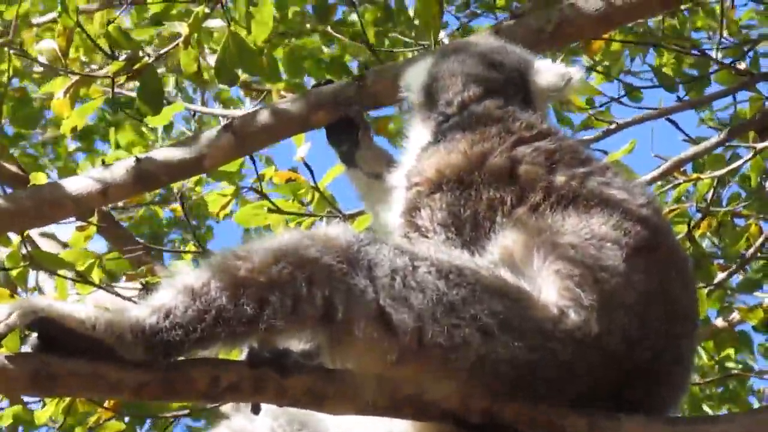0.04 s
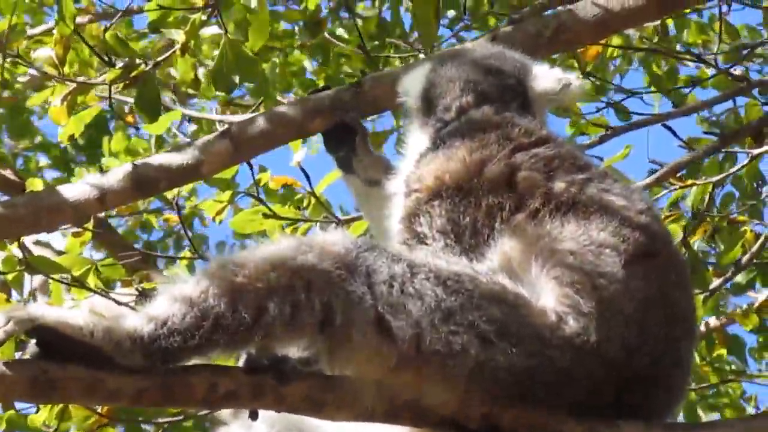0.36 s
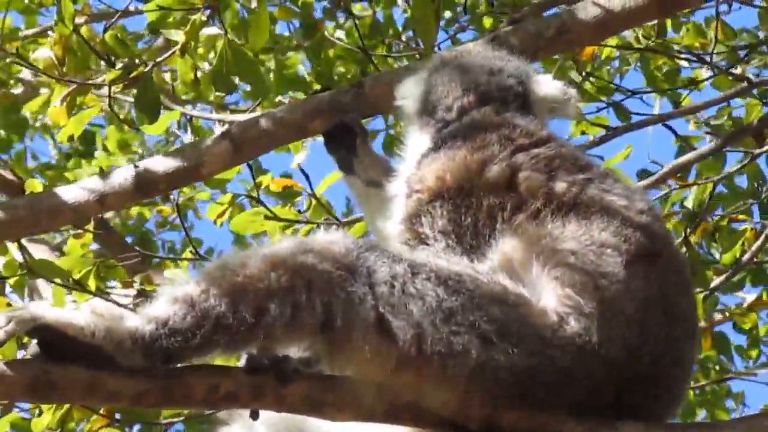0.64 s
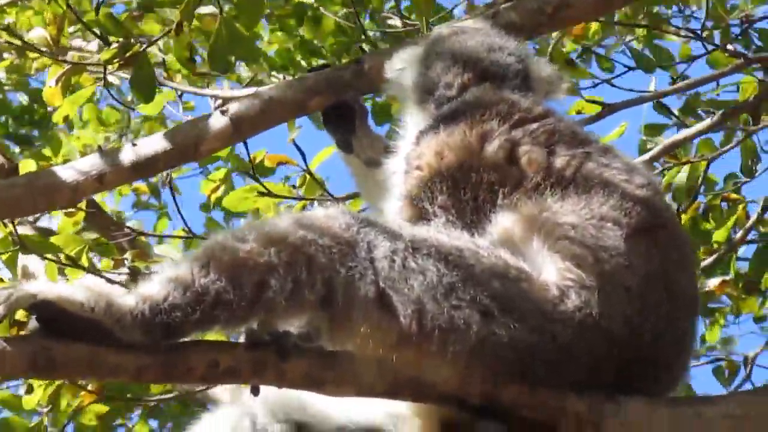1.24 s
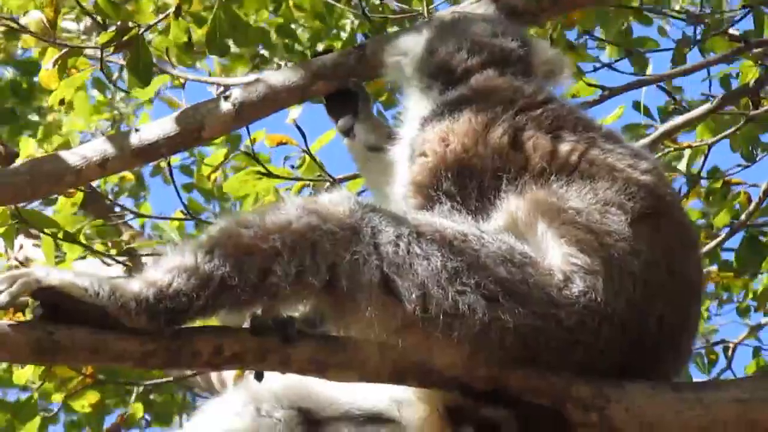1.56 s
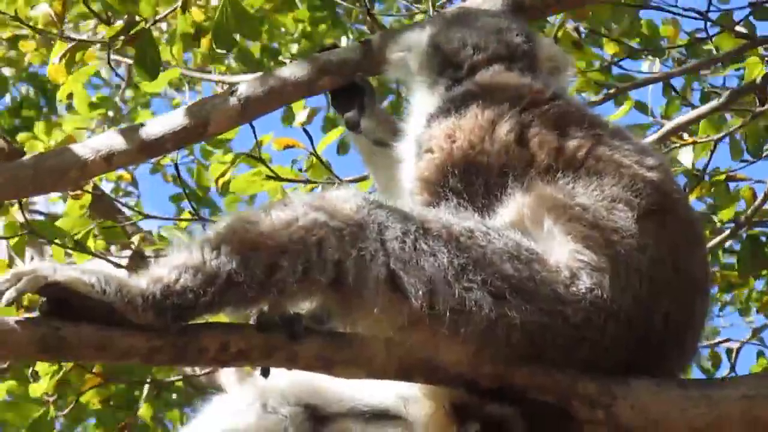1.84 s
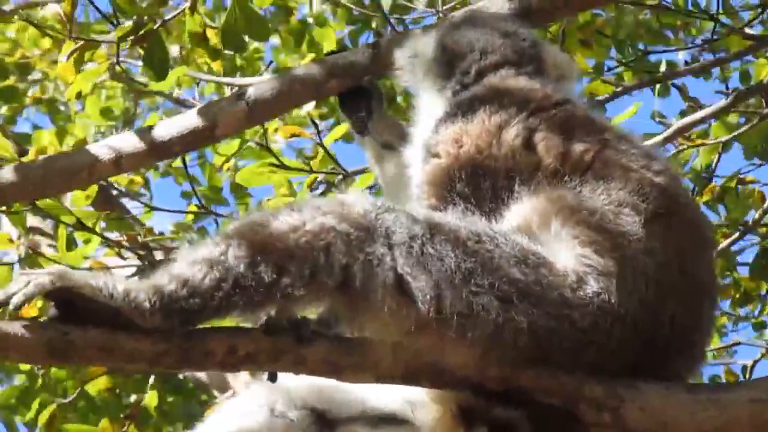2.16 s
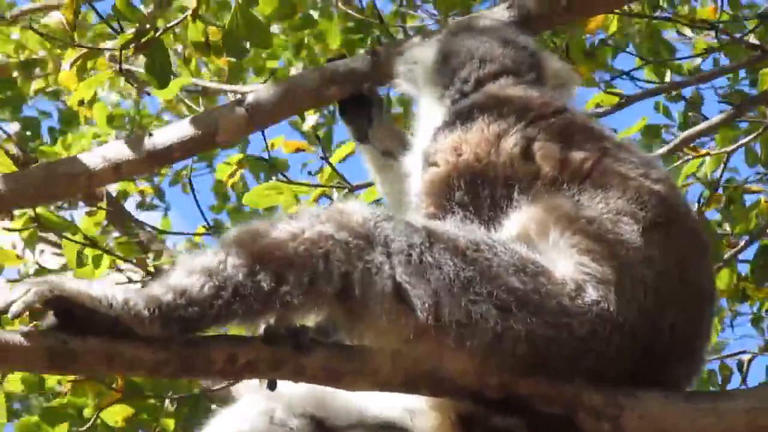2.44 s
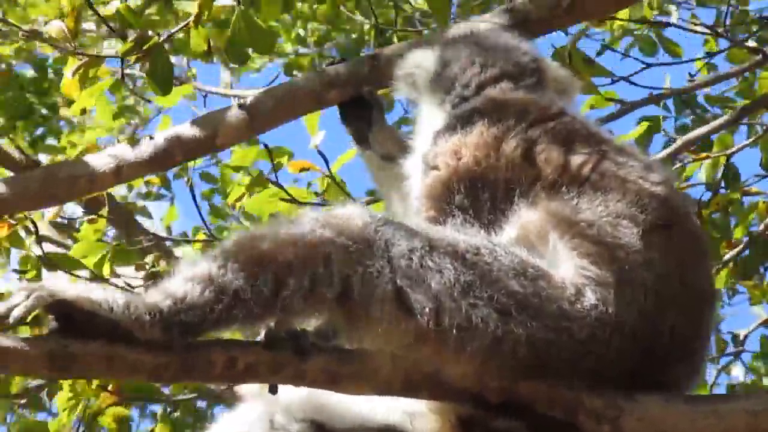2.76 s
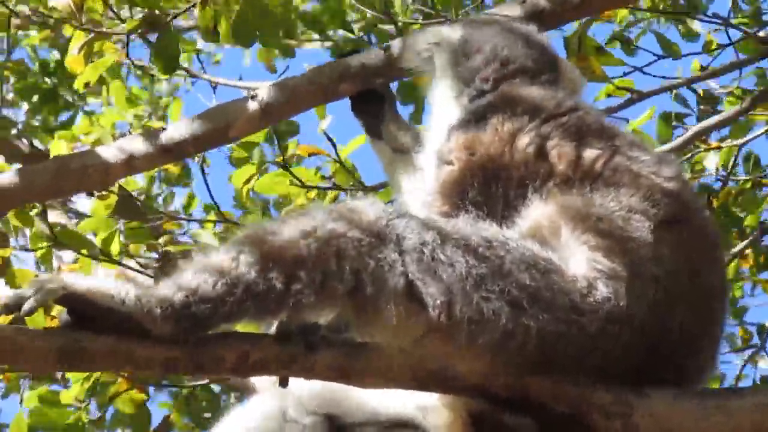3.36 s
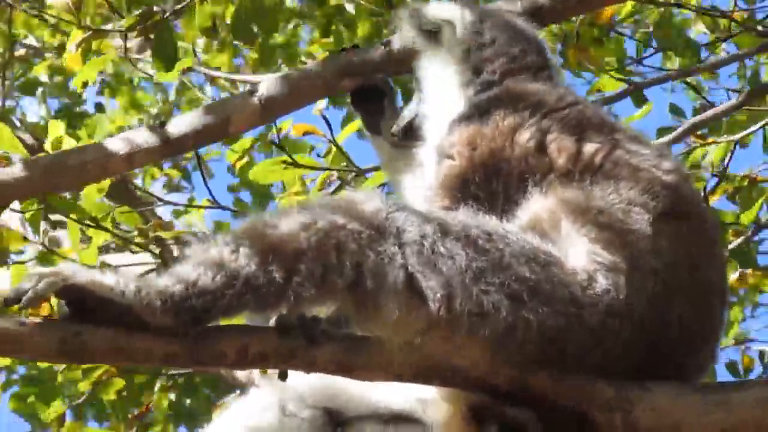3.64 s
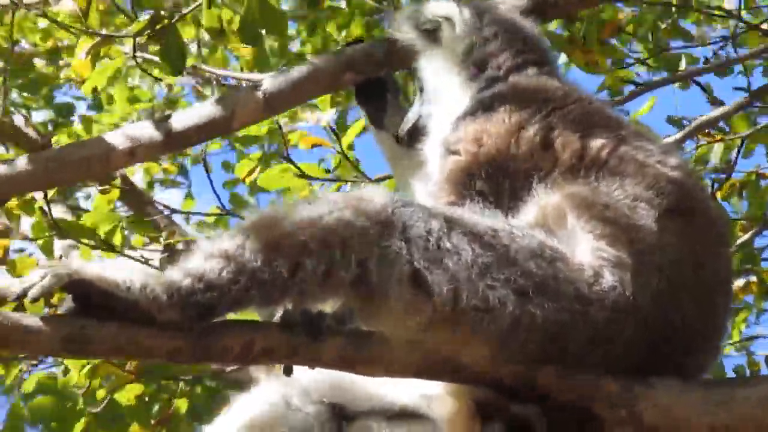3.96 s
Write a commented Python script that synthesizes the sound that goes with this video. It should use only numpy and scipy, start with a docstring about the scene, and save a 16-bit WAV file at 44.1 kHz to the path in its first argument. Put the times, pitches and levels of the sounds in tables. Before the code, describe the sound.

Wind buffets the microphone with a low, uneven rumble, mostly on the right, over a soft, steady hiss of leaves. The gusts thump hardest from about 1 to 2 seconds and ease after 3. A small bird gives three faint, very high, rasping, falling calls at about 2.6, 3 and 3.4 seconds. Brief, faint dry rustles come near 1.1, 3.4 and 3.9 seconds.

```python
"""Wind on a microphone under a tree

Turbulent pressure buffets the two ports of a camera microphone, mostly the right one; stronger wind
feeds the small eddies most, so gusts are brighter as well as louder. A small bird gives three thin,
rasping, falling calls, and there are a few dry rustles over a steady broadband hiss of leaves.
The hardest thump of wind makes the camera's limiter duck everything for a moment."""
import sys
import numpy as np
from scipy import signal
from scipy.fft import rfft, irfft, next_fast_len
from scipy.io import wavfile
from scipy.ndimage import uniform_filter1d, minimum_filter1d, map_coordinates

SR = 44100
rng = np.random.default_rng(int(sys.argv[2]) if len(sys.argv) > 2 else 0)


def digitize_waveform(pressure):
    """Quantize a signal to 16-bit integers and store it at the path in sys.argv[1].

    Rows of a 2-D input are taken as channels; values are limited to [-1, 1].
    """
    field = np.atleast_2d(pressure).T
    bounded = np.clip(field, -1, 1)
    quanta = np.round(bounded * 32767).astype(np.int16)
    wavfile.write(sys.argv[1], SR, quanta)


N = 176400
T = np.arange(N) / SR

# wind strength at each port; the right is windward most of the time (t/s, level/dB)
LEFT_WIND = [(0.0, -29.5), (0.03, -31.5), (0.1, -35), (0.13, -17), (0.16, -42), (0.18, -21), (0.21, -37),
             (0.29, -29), (0.32, -44), (0.43, -43), (0.52, -25.5), (0.56, -20.5), (0.58, -19.5),
             (0.74, -22.5), (0.83, -39.5), (0.93, -39), (0.96, -32), (1.04, -41), (1.15, -32), (1.2, -46),
             (1.25, -33), (1.35, -43), (1.53, -25), (1.58, -17.5), (1.61, -27.5), (1.64, -14), (1.71, -39),
             (1.83, -27), (1.85, -10), (1.91, -44), (2.29, -41), (2.32, -32), (2.51, -40), (2.75, -33),
             (2.77, -39), (3.0, -33.5), (3.02, -22), (3.05, -40), (3.07, -27), (3.1, -37), (3.14, -30),
             (3.17, -41.5), (3.66, -46.5), (3.71, -32), (3.75, -38), (3.78, -29), (3.8, -30.5), (3.99, -55)]
RIGHT_WIND = [(0.0, -29), (0.05, -31.5), (0.09, -18.5), (0.12, -30.5), (0.24, -16.5), (0.31, -32),
              (0.33, -22.5), (0.35, -28.5), (0.44, -35.5), (0.46, -19.5), (0.53, -25), (0.59, -20),
              (0.7, -30.5), (0.73, -17), (0.78, -26.5), (0.81, -35.5), (0.89, -25.5), (0.93, -25.5),
              (0.96, -17), (0.98, -13.5), (1.01, -30), (1.05, -27.5), (1.09, -14), (1.14, -14), (1.2, -13),
              (1.32, -13), (1.35, -18.5), (1.51, -18), (1.59, -25), (1.61, -15.5), (1.73, -27.5),
              (1.78, -15), (1.87, -18), (1.9, -29), (2.12, -13), (2.15, -26), (2.18, -17), (2.21, -33.5),
              (2.25, -22), (2.29, -22), (2.32, -21.5), (2.39, -22), (2.42, -15.5), (2.46, -36.5),
              (2.49, -24), (2.52, -36), (2.56, -21.5), (2.65, -18.5), (2.68, -27.5), (2.72, -24.5),
              (2.8, -31), (2.82, -18.5), (2.88, -33), (2.91, -24), (2.94, -34), (3.01, -28), (3.06, -45),
              (3.14, -30.5), (3.17, -46), (3.36, -36), (3.46, -23), (3.57, -37), (3.63, -29), (3.68, -43),
              (3.75, -33), (3.81, -21.5), (3.84, -43), (3.89, -46), (3.97, -25.5), (3.99, -35)]
# pressure spectra of three sizes of eddy (f/Hz, relative level/dB)
LARGE_EDDIES = [(5, -50), (15, -6), (27, -8), (55, 0), (100, -5), (160, -17.5), (260, -45), (600, -58),
                (2000, -120)]
MIDDLE_EDDIES = [(8, -52), (30, 1.5), (90, -2), (150, -1), (240, -7), (350, -22), (550, -45), (1200, -80),
                 (3000, -120)]
SMALL_EDDIES = [(10, -50), (60, 15), (180, -7.5), (290, 3.5), (420, -3.5), (600, -15), (900, -28.5),
                (1600, -40), (5000, -85)]
# single hard eddies (t/s, pulse level/dB, centre f/Hz, port: 0 left, 1 right)
THUMPS = [(0.085, -11, 187, 1), (0.127, -7, 59, 0), (0.558, -4.5, 129, 0), (0.586, -6, 164, 1),
          (0.745, -7, 152, 1), (0.958, -3, 205, 1), (0.969, -6, 236, 1), (1.084, -9, 330, 1),
          (1.094, -4.5, 282, 1), (1.146, 4.5, 199, 1), (1.159, -4.5, 240, 1), (1.179, 0, 264, 1),
          (1.223, -5, 318, 1), (1.251, -1, 182, 1), (1.31, -8, 278, 1), (1.583, -8.5, 65, 0),
          (1.776, 1, 165, 1), (1.851, -9.5, 99, 0), (1.863, -7, 222, 1), (2.104, -7.5, 151, 1),
          (2.331, -5.5, 217, 1), (2.416, -8.5, 117, 1), (2.606, -17, 247, 1), (2.825, -15, 179, 1),
          (3.078, -17.5, 150, 0), (3.464, -15, 136, 1), (3.781, -12, 64, 0), (3.804, -9.5, 107, 1)]
# bird calls (start t/s, duration/s, f/Hz, level/dB, sag/Hz, final fall/Hz)
BIRD_CALLS = [(2.585, .28, 7360, -54, 30, 813), (2.972, .325, 7380, -48.5, -3.5, 870),
              (3.37, 0.41, 7300, -49.5, 181, 541)]
# dry rustles (start t/s, time until decay/s, level/dB, left minus right/dB)
RUSTLES = [(1.103, .018, -43.5, 2.5), (3.36, .026, -53, .5), (3.932, .014, -47.5, 2)]
# spectra of the rustles, the near leaves and the farther trees (f/Hz, relative level/dB)
RUSTLE_SPECTRUM = [(1000, -17), (3500, -6), (6500, 5), (7500, -6.5), (8600, 8.5), (10300, -5), (12400, 2),
                   (15000, -4), (17000, -30)]
LEAF_SPECTRUM = [(400, 6), (1200, 5.5), (2200, -2), (3000, -0.5), (4000, -2), (5200, 0), (6800, -0.5),
                 (8600, -3), (10300, -8), (12500, -7), (15500, -14)]
FAR_SPECTRUM = [(30, -3), (120, 2.5), (280, 1), (520, 2), (750, -1), (1300, -5), (1800, -10.5),
                (2400, -17.5), (3500, -19), (6000, -57), (12000, -62)]
# channel balance of the near leaves (f/Hz, left minus right/dB)
LEAF_BALANCE = [(1000, -0.5), (3000, -4), (6000, 0), (8500, 2), (14000, 1.5)]
# envelopes of the near leaves and the farther trees (t/s, level/dB)
LEAF_LEVEL = [(0, -47), (.35, -46), (.7, -44), (1.05, -45.5), (1.5, -47.5), (2, -46.5), (2.4, -47.5),
              (2.8, -49.5), (3.3, -50), (4, -49.5)]
FAR_LEVEL = [(0, -43), (.8, -41.5), (1.5, -44), (2.3, -45.5), (3.2, -46), (4, -47.5)]

MODERATE_WIND_DB, FLUTTER_DB, FLUTTER_PER_S = -20.5, 2.27, 64
WIDENING = 0.28  # share of each port's wind noise that enters the other channel inverted
CALL_ATTACK_S, CALL_RELEASE_S = 0.15, 0.076
ONSET_HZ, BEND_S, SAG_AT_S, FALL_S = 432, .05, 0.21, .13  # each call starts high, may sag, then falls
RASP_HZ, RASP_PER_S, RASP_DB = 186, 750, 2.5  # pitch scatter, its rate, level scatter
UPPER_RATIO, UPPER_DB = 1.105, -8.5  # the bird's second voice relative to its first
ECHO_T60_S, ECHO_DB = 0.56, 1
RUSTLE_ATTACK_S, RUSTLE_DECAY_S, GRAIN_DB, GRAIN_PER_S = .012, .013, 2.2, 700
CEILING, HOLD_S, RECOVER_DB_PER_S, BAND_LIMIT_HZ = .98, .06, 24, 15800


def buffeting():
    """Turbulent pressure at the ports: three eddy sizes superpose, and hard eddies strike as pulses."""
    wind_db = np.array([curve(LEFT_WIND), curve(RIGHT_WIND)])
    large = eddies(LARGE_EDDIES, wind_db, offset_db=-2.5, growth=np.array([[.9], [.75]]))
    middle = eddies(MIDDLE_EDDIES, wind_db, offset_db=-2.5, growth=1.2)
    small = eddies(SMALL_EDDIES, wind_db, offset_db=-12.5, growth=2.22)
    ports = large * amp([[3.5], [-2.5]]) + middle * amp([[-2], [.5]]) + small * amp([[-6], [0]])
    for at, db, hz, port in THUMPS:
        u = (np.pi * hz * (T - at)) ** 2
        pulse = amp(db) * (1 - 2 * u) * np.exp(-u)
        ports[port] = ports[port] * (1 - np.exp(-u / 4)) + pulse  # briefly replaces the turbulence
    return ports - WIDENING * ports[::-1]


def eddies(spectrum, wind_db, offset_db, growth):
    """Power-law scaling: turbulence of one size gains `growth` dB per dB of wind, and flutters."""
    swirl = noise(spectrum)
    power = uniform_filter1d(uniform_filter1d(swirl ** 2, size=1300), size=900)
    steady = swirl / np.sqrt(np.abs(power) + 1e-6)
    level_db = MODERATE_WIND_DB + offset_db + growth * (wind_db - MODERATE_WIND_DB)
    return steady * amp(level_db + FLUTTER_DB * wobble(FLUTTER_PER_S) - 0.5)


def bird():
    """Random frequency and amplitude modulation roughen two high voices that glide down together."""
    song = np.zeros(N)
    for start, length, hz, db, sag_hz, fall_hz in BIRD_CALLS:
        t = np.clip(T - start, 0, length)
        onset = ONSET_HZ * np.exp(-(t / BEND_S) ** 2)
        sag = sag_hz * np.exp(-((t - SAG_AT_S) / BEND_S) ** 2)
        fall = fall_hz * np.clip(1 - (length - t) / FALL_S, 0, 1) ** 1.4
        pitch = hz + onset - sag - fall
        swell = np.sqrt(np.clip(t / CALL_ATTACK_S, 0, 1) * np.clip((length - t) / CALL_RELEASE_S, 0, 1))
        voices = voice(pitch) + amp(UPPER_DB) * voice(pitch * UPPER_RATIO)
        song += amp(db) * swell * unit(voices * amp(RASP_DB * wobble(220)))
    # the left channel leads by 28 microseconds
    direct = filtered(song, lambda hz: np.exp(1j * np.pi * hz * 2.8e-5 * np.array([[1], [-1]])))
    return direct * amp([[-1.2], [1.2]]) + amp(ECHO_DB) * canopy(song)


def voice(hz):
    """Frequency jitter spreads a pure tone into a narrow, rasping band."""
    return np.sin(2 * np.pi * np.cumsum(hz + RASP_HZ * wobble(RASP_PER_S)) / SR)


def canopy(x):
    """Scattering among the branches gives an exponentially decaying tail, different in each channel."""
    tail = rng.standard_normal((2, SR)) * amp(-60 * T[:SR] / ECHO_T60_S)
    return signal.fftconvolve(x[None], tail / np.linalg.norm(tail[0]), axes=1)[:, :N]


def rustles():
    """Friction, as of dry leaves or bark, gives brief bursts of grainy noise."""
    out = np.zeros((2, N))
    for start, length, db, pan_db in RUSTLES:
        attack = np.clip((T - start) / RUSTLE_ATTACK_S, 0, 1)
        decay = np.exp(-np.maximum(T - start - length, 0) / RUSTLE_DECAY_S)
        scrape = unit(noise(RUSTLE_SPECTRUM) * amp(GRAIN_DB * wobble(GRAIN_PER_S)))
        out += attack * decay * scrape * amp(db) * pan(pan_db)
    return out


def trees():
    """Coherence sets width: near leaves hiss incoherently all around, far trees rush in the centre."""
    hiss = filtered(noise(LEAF_SPECTRUM), lambda hz: pan(along(LEAF_BALANCE, hz)))
    near_db = curve(LEAF_LEVEL) + 0.46 * wobble(14) + 0.83 * np.array([wobble(250), wobble(250)])
    far = noise(FAR_SPECTRUM, channels=1) * amp(curve(FAR_LEVEL) + 0.39 * wobble(8))
    return hiss * amp(near_db) + far


def amp(db):
    """Amplitude ratio of a level in decibels."""
    return 10 ** (np.asarray(db) / 20)


def pan(db):
    """Left and right gains for a level difference."""
    return amp(db * np.array([[.5], [-.5]]))


def unit(x):
    """Normalisation to rms 1."""
    return x / np.sqrt(np.mean(x ** 2) + 1e-20)


def along(points, hz):
    """Interpolation of (f/Hz, value) points on a logarithmic frequency axis."""
    f, values = np.transpose(points)
    return np.interp(np.log(hz + 1), np.log(f + 1), values)


def curve(rows):
    """Linear interpolation of (t/s, value) points at every sample."""
    return np.interp(T, *np.transpose(rows))


def wobble(rate):
    """Spline interpolation through `rate` random values a second."""
    return map_coordinates(rng.standard_normal(N // 8), [T * rate], mode="wrap")


def filtered(x, response):
    """Linear filtering: the spectrum of x times a frequency response."""
    size = next_fast_len(N + SR // 2)
    return irfft(rfft(x, size) * response(np.fft.rfftfreq(size, 1 / SR)), size)[..., :N]


def noise(spectrum, channels=2):
    """Spectral shaping of white noise, at rms 1 and uncorrelated between channels."""
    return unit(filtered(rng.standard_normal((channels, N)), lambda hz: amp(along(spectrum, hz))))


def scene():
    """Superposition: the pressures of all sources add at the microphone."""
    return buffeting() + trees() + bird() + rustles()


def record(dry):
    """Peak limiting: the gain drops at once, holds and recovers slowly; a low-pass limits the band."""
    over_db = 20 * np.log10(np.maximum(np.abs(dry).max(axis=0) / CEILING, 1))
    recovery_db = RECOVER_DB_PER_S * T
    duck_db = np.maximum.accumulate(over_db + recovery_db) - recovery_db
    hold = 2 * int(HOLD_S * SR / 2) + 1
    gain = minimum_filter1d(amp(-duck_db), size=hold, origin=hold // 2)
    return filtered(dry * uniform_filter1d(gain, size=24), lambda hz: hz < BAND_LIMIT_HZ)


dry = scene()
out = record(dry)
digitize_waveform(out)
```